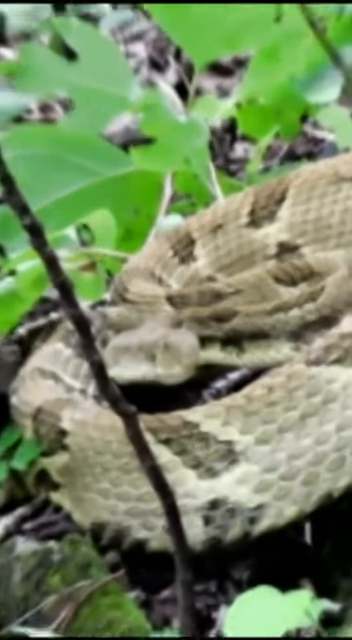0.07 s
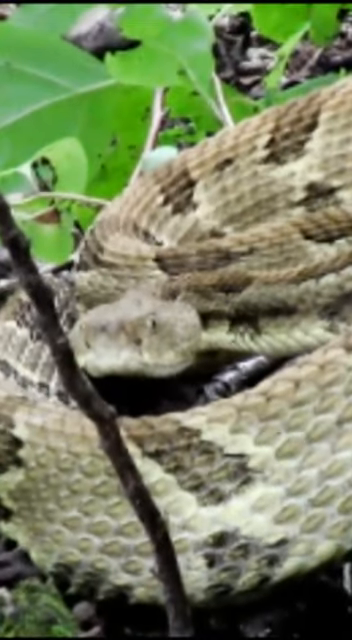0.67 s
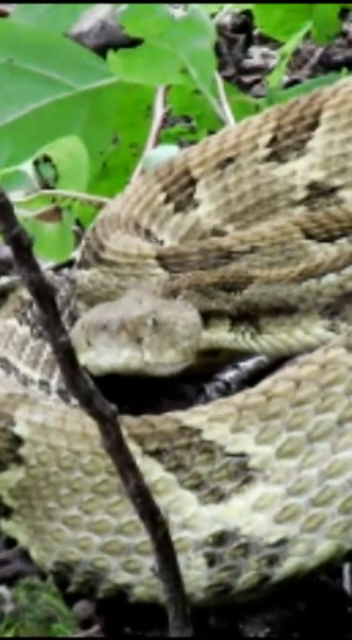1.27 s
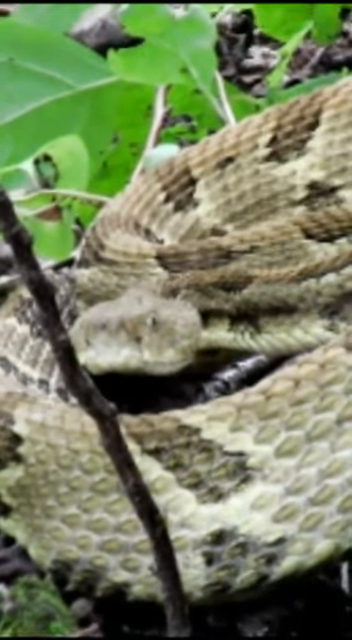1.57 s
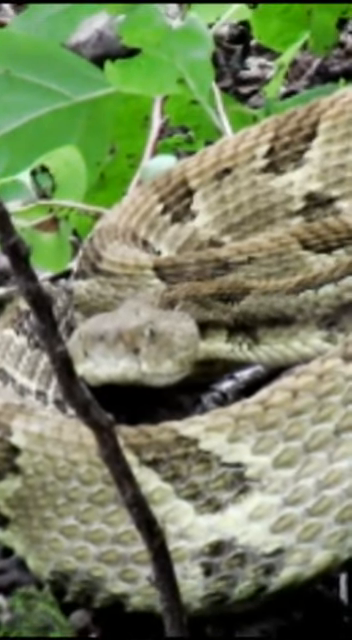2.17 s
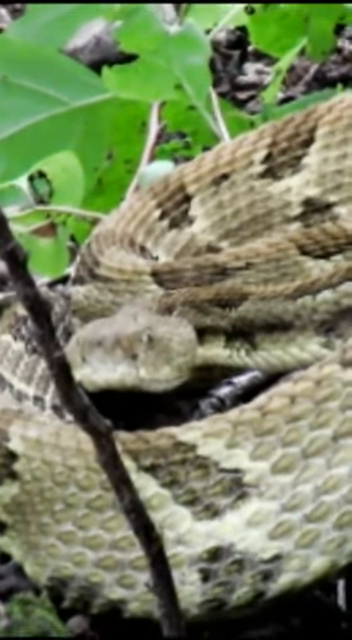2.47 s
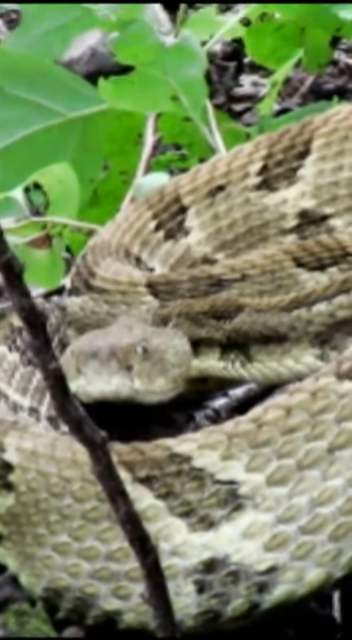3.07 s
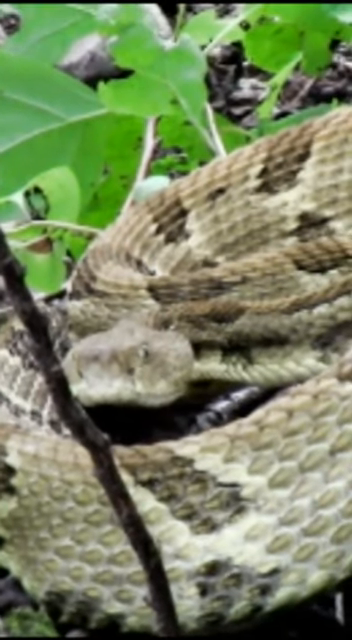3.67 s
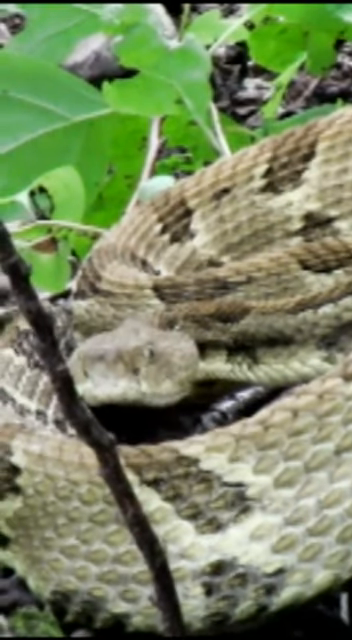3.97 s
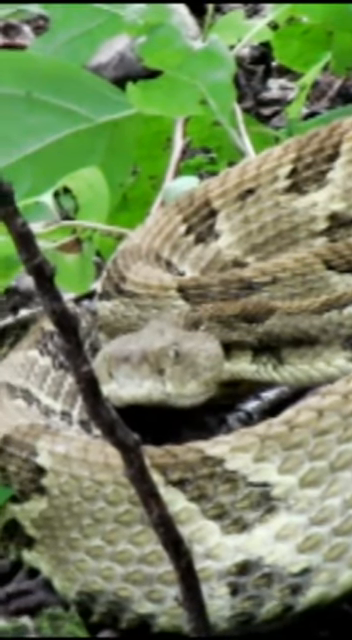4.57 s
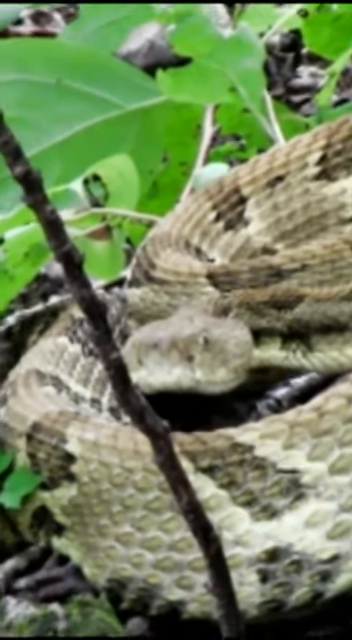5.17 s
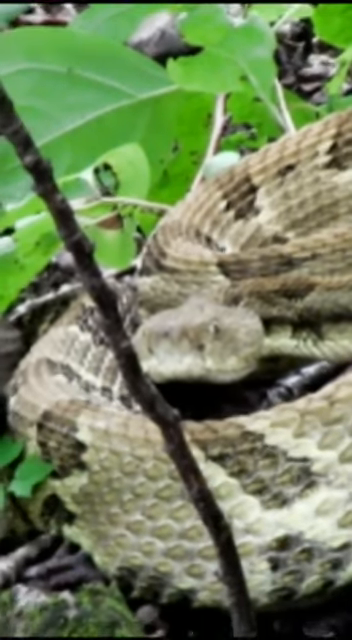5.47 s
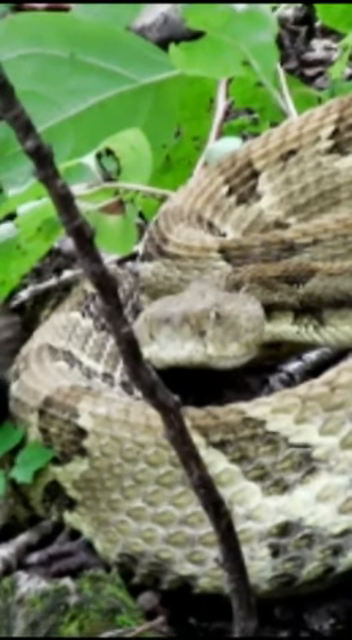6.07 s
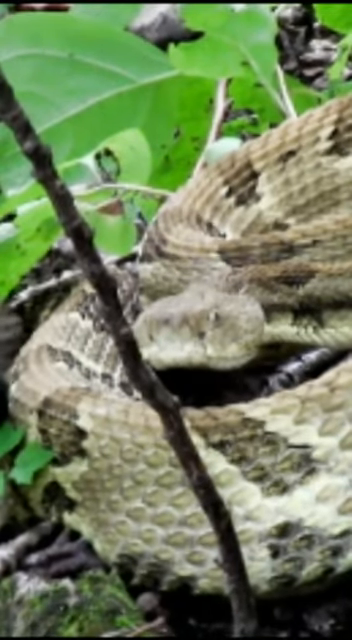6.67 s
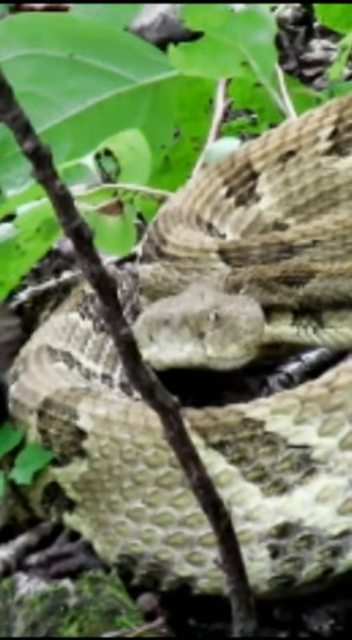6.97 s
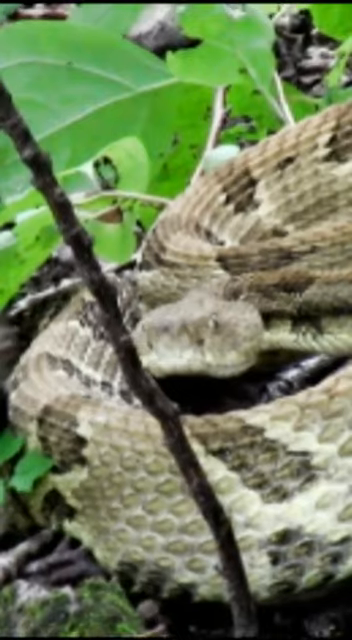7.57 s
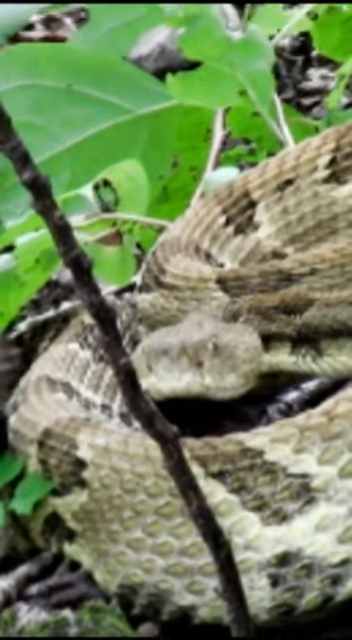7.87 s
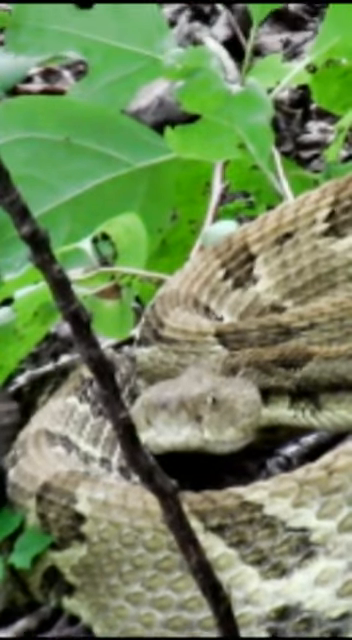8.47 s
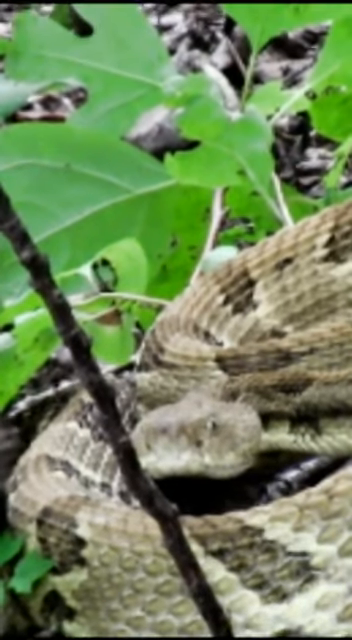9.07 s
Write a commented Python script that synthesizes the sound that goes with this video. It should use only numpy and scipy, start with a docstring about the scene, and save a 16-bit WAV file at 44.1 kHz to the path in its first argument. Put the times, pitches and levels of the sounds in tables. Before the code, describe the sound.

A rattlesnake shakes its tail close by in a dry, steady buzz, over faint woodland rumble and hiss.

```python
"""A dry, steady buzz: a coiled rattlesnake shakes its tail in leaf litter, straight ahead and close to
the microphone of a hand-held camera. The tail swings about 46 times a second; on the hard stroke and on
the softer return its loose horny segments knock together one after another and ring. Dry leaves scatter
the clicks. Beneath lie the faint far-off rumble of a quiet wood, the microphone's own hiss and the hum
of the lens motor."""
import sys
import numpy as np
from scipy import signal
from scipy.fft import rfft, irfft
from scipy.io import wavfile
from scipy.ndimage import uniform_filter1d

SR = 44100
rng = np.random.default_rng(int(sys.argv[2]) if len(sys.argv) > 2 else 0)


def pcm_store(signal):
    """Save signal as 16-bit PCM."""
    levels = np.round(np.clip(np.atleast_2d(signal), -1, 1) * 32767)
    wavfile.write(sys.argv[1], SR, levels.astype(np.int16).T)


N = 410571
TIME = np.arange(N) / SR
RESPONSE_SAMPLES = 4096
RESPONSE_HZ = np.fft.rfftfreq(RESPONSE_SAMPLES, 1 / SR)


def undb(db):
    """Decibels to gain."""
    return 10 ** (np.asarray(db) / 20)


def level(x, db):
    """Scale to an rms level."""
    return x * undb(db) / np.sqrt(np.mean(x ** 2))


def over_time(rows):
    """Join (seconds, value) rows by straight lines."""
    return np.interp(TIME, *np.transpose(rows))


def over_frequency(rows, freq):
    """Join (Hz, value) rows on a log-frequency axis."""
    hz, value = np.transpose(rows)
    return np.interp(np.log(freq + 1), np.log(hz), value)


def wander(count):
    """Slow drift: random values spread evenly over the scene and joined by straight lines."""
    return np.interp(TIME, np.linspace(0, TIME[-1], count), rng.standard_normal(count))


def resonance(hz, width_hz):
    """Power response of one mode, 1 at its centre."""
    return 1 / (1 + (2 * (RESPONSE_HZ - hz) / width_hz) ** 2)


def ring(gain):
    """The minimum-phase impulse response that has this gain at each frequency."""
    cepstrum = irfft(np.log(gain + 1e-6))
    cepstrum[1:RESPONSE_SAMPLES // 2] *= 2
    cepstrum[RESPONSE_SAMPLES // 2 + 1:] = 0
    return irfft(np.exp(rfft(cepstrum)))


# The distant wood in the bass, the microphone's own hiss in the treble.
# Each row: frequency in Hz, relative spectral density in dB.
BACKGROUND_SPECTRUM = [(25, -17), (60, -14), (120, -5.5), (200, -1.5), (300, -0.5), (480, -0.5),
                       (640, -5.5), (1000, -8.5), (1600, -11.5), (3000, -11.5), (15000, -16)]
# How alike the background is left and right. Each row: frequency in Hz, likeness from 0 to 1.
BACKGROUND_LIKENESS = [(40, .05), (125, 0.21), (300, 0.45), (550, 0.5), (1000, 0.85), (2000, 1)]


def rumble_and_hiss(db=-53, waver_db=.5):
    """Faint far-off rumble of the wood, wide and slightly to the left, with the microphone's own hiss."""
    freq = np.fft.rfftfreq(N, 1 / SR)
    correlation = np.clip(over_frequency(BACKGROUND_LIKENESS, freq), 0, .96)
    noise = rfft(rng.standard_normal((2, N))) * undb(over_frequency(BACKGROUND_SPECTRUM, freq))
    mid, side = noise * np.sqrt([1 + correlation, 1 - correlation])
    left_lift_db = 1.6 / (1 + (freq / 750) ** 4)
    stereo = irfft(np.array([(mid + side) * undb(left_lift_db), mid - side]), N)
    return level(stereo, db) * undb(waver_db * wander(count=30))


# Runs of the lens motor, at the camera. Each row: start in seconds, end in seconds, rms level in dB.
LENS_RUNS = [(0, 0.263, -62.5), (6.3, 9.3, -71.5)]


def lens_motor(hum_hz=182.4, waver_hz=2.38, fade_s=.05):
    """The lens motor hums during a short zoom and again more faintly later, wavering in pitch."""
    hz = hum_hz + waver_hz * wander(count=120)
    running = sum(undb(db) * over_time([(start - fade_s, 0), (start, 1), (end, 1), (end + fade_s, 0)])
                  for start, end, db in LENS_RUNS)
    return np.sqrt(2) * np.sin(2 * np.pi * np.cumsum(hz) / SR) * running


def foliage(near_db=-10, near_t60_s=.029, far_db=-13, far_t60_s=.092, build_s=.0021, side_db=-20):
    """Stereo path to the microphone: the direct click, then echoes off the litter and the leaves above."""
    t = TIME[:RESPONSE_SAMPLES]
    direct, echoes = 1. * (t == 0), 0
    for db, t60_s in (near_db, near_t60_s), (far_db, far_t60_s):
        envelope = (1 - np.exp(-t / build_s)) * np.exp(-np.log(1000) * t / t60_s)
        envelope /= np.linalg.norm(envelope)
        echoes = echoes + undb(db) * envelope * rng.standard_normal((2, RESPONSE_SAMPLES))
    mid = direct + echoes[0]
    # the microphone's two ports lie close together, so only short waves differ between them
    side = np.diff(undb(side_db) * echoes[1], prepend=0)
    return np.array([mid + side, mid - side])


# Modes of the rattle's hollow segments. Each row: centre in Hz, width in Hz, relative level in dB.
SHELL_MODES = [(3117, 450, -14.5), (3533, 214, -4), (3790, 270, -6.5), (4107, 140, -3), (4354, 650, 0.5),
               (4873, 350, -0.45), (5296, 195, 0.9), (5450, 260, 0.5), (5780, 160, -2.5), (6118, 380, -2),
               (6560, 305, -0.2), (6954, 240, -2.5), (7500, 260, -5), (7870, 950, -4.5), (8810, 1600, -11),
               (10140, 1420, -15.5), (11900, 950, -16), (13640, 2300, -19), (15600, 2230, -23)]


def shell(tap_db=-23, tap_hz=2100, tap_width_hz=1600):
    """Gain of the rattle's shell: steep modes of its coupled segments, and a weak dull tap below them."""
    mode_power = sum(undb(db) ** 2 * resonance(hz, width_hz) ** 2 for hz, width_hz, db in SHELL_MODES)
    tap_power = undb(tap_db) ** 2 * resonance(tap_hz, tap_width_hz)
    radiation = RESPONSE_HZ / (RESPONSE_HZ + 600)  # so small a body radiates almost no bass
    return np.sqrt(mode_power + tap_power) * radiation


def collisions(times, force, bounce_s=.00029, loss_db=1.47, uneven_db=2.5, rebounds=5):
    """Each collision shares the energy of its swing unevenly between a click and its fading rebounds."""
    shape = (len(times), rebounds + 1)
    share = undb(uneven_db * rng.standard_normal(shape) - loss_db * np.arange(rebounds + 1))
    share /= np.linalg.norm(share, axis=1, keepdims=True)
    impulses = force[:, None] * share * rng.choice([-1, 1], shape)
    gaps_s = bounce_s * (.5 + rng.random(shape))
    click_s = times[:, None] + np.cumsum(gaps_s, axis=1) - gaps_s[:, :1]
    inside = (click_s > 0) & (click_s < TIME[-1])
    return np.bincount((click_s[inside] * SR).astype(int), impulses[inside], N)


# The tail eases off slowly, falters once and picks up. Each row: time in seconds, swings per second.
TAIL_SPEED = [(0.0, 46.615), (1.13, 46.231), (2.36, 46.368), (4.72, 45.758), (5.76, 45.913), (6.08, 45.498),
              (6.4, 45.938), (7.74, 45.802), (9.31, 46.373)]
# The knocks within one swing. Each row: place in the swing from 0 to 1, scatter in swings,
# relative level in dB, low ring in Hz, its lift in dB, high ring in Hz, its lift in dB.
SWING_KNOCKS = [(.058, .007, -1.06, 5850, 9, 13500, 3), (.096, .011, -5, 5600, 2, 13300, -9),
                (.158, .013, 2.5, 4320, 3, 14000, 3), (.212, .018, 1, 4400, -12, 8400, -3),
                (.266, .011, 3.4, 4600, -3.5, 10100, 1.5), (.305, .02, -7.5, 5230, 6, 14700, 17),
                (.527, .016, -1, 7800, 0.5, 11300, 7), (.595, .016, -1, 5500, -5, 11900, -9),
                (.65, .015, 0.5, 4400, -2, 11200, 6), (.752, .02, 0, 4300, 1, 6960, -4),
                (.818, .016, -7, 4300, 3.5, 6900, 2), (.855, .02, -5, 4280, 0.5, 6740, 4.5),
                (.965, .04, -9, 7000, 1, 12000, 7)]


def rattlesnake(db=-37, start_phase=.639, jitter_swings=.005, effort_db=.56,
                low_width_hz=1300, high_width_hz=1700):
    """Close to the microphone, each swing of the tail sets off the same chain of ringing knocks."""
    phase = start_phase + np.cumsum(over_time(TAIL_SPEED)) / SR  # in swings
    swings = np.arange(int(phase[-1]) + 1)
    lag = jitter_swings * rng.standard_normal(len(swings))
    # the effort of the tail muscles wanders slightly over a few swings
    force = undb(effort_db * uniform_filter1d(rng.standard_normal(len(swings)), size=4))
    shell_gain, buzz = shell(), 0
    for place, scatter, knock_db, low_hz, low_db, high_hz, high_db in SWING_KNOCKS:
        knock_phase = swings + place + lag + scatter * rng.standard_normal(len(swings))
        knock_s = np.interp(knock_phase, phase, TIME, left=-1, right=-1)  # -1: outside the scene
        # each joint favours its own part of the shell's spectrum
        lift_db = low_db * resonance(low_hz, low_width_hz) + high_db * resonance(high_hz, high_width_hz)
        joint_ring = ring(shell_gain * undb(knock_db + lift_db))
        response = signal.fftconvolve(foliage(), joint_ring[None], axes=1)[:, :RESPONSE_SAMPLES]
        clicks = collisions(knock_s, force)
        buzz = buzz + signal.oaconvolve(clicks[None], response, axes=1)[:, :N]
    return level(buzz, db)


def scene():
    """The snake close and straight ahead, over the distant wood, the microphone's hiss and the lens."""
    return rattlesnake() + rumble_and_hiss() + lens_motor()


def record(dry):
    """The camera cuts the top of the treble steeply."""
    low_pass = signal.ellip(12, .1, 75, 15750, fs=SR, output="sos")
    return signal.sosfilt(low_pass, dry)


dry = scene()
out = record(dry)
pcm_store(out)
```